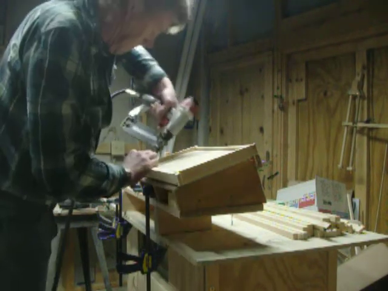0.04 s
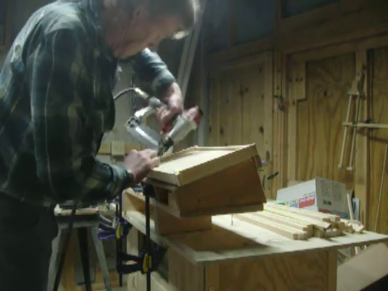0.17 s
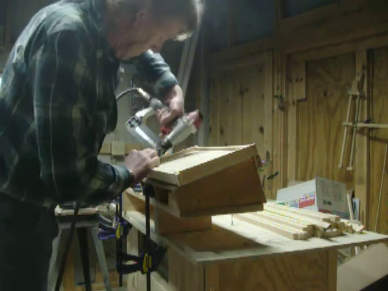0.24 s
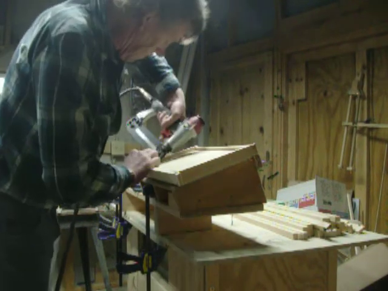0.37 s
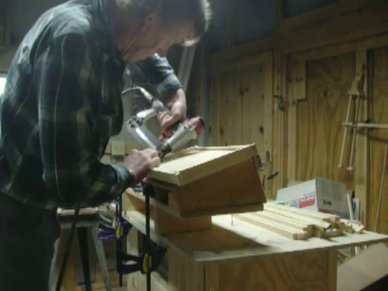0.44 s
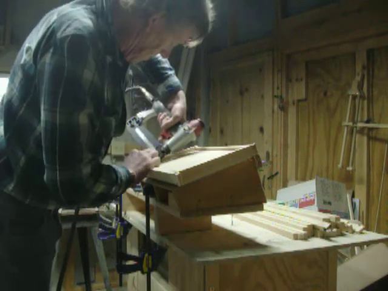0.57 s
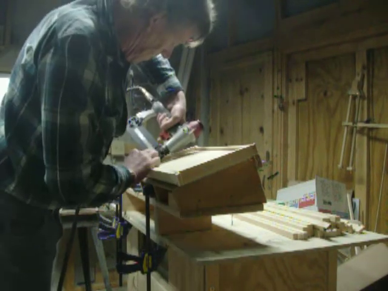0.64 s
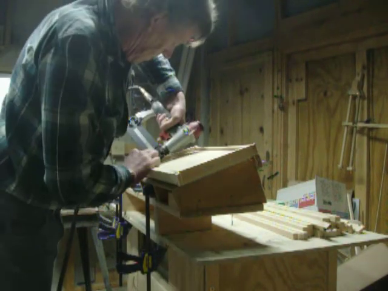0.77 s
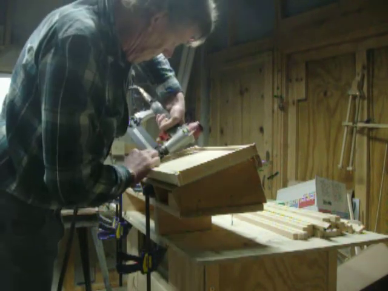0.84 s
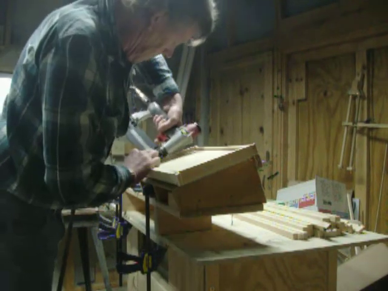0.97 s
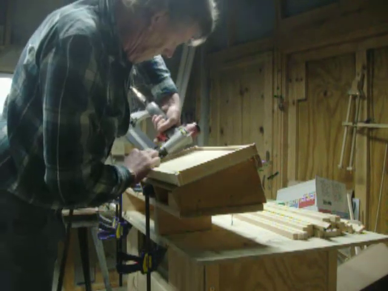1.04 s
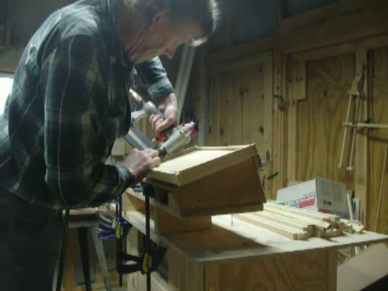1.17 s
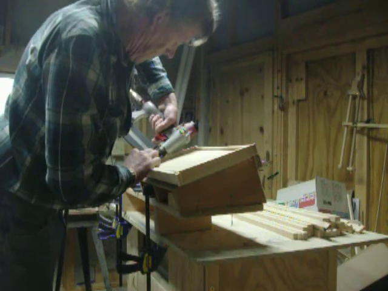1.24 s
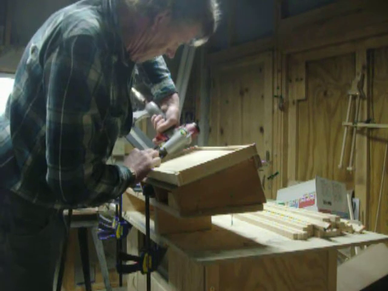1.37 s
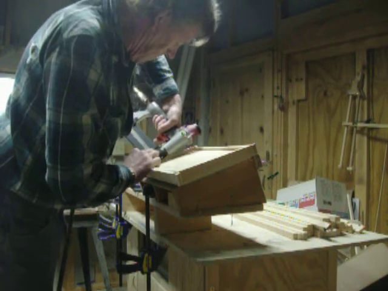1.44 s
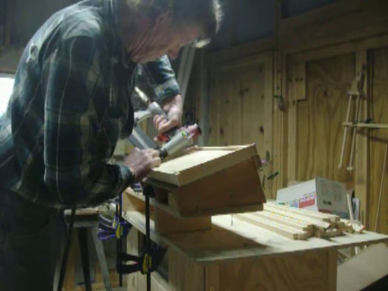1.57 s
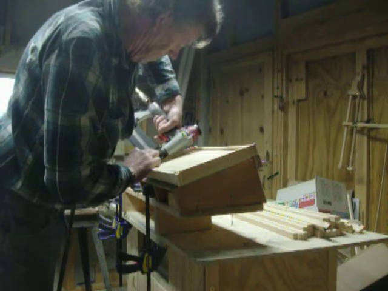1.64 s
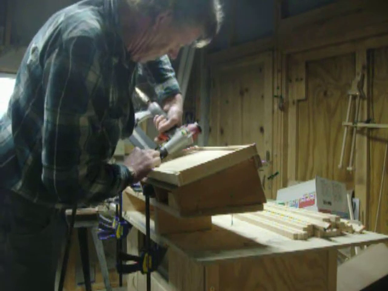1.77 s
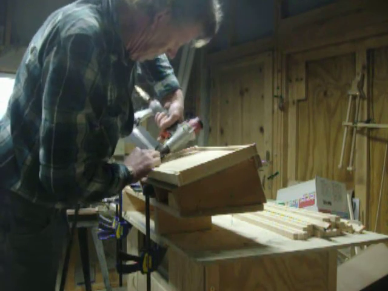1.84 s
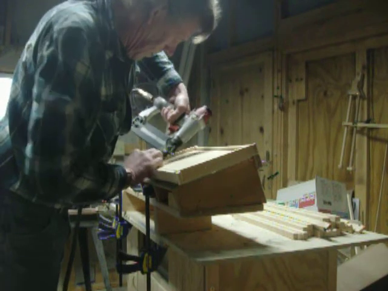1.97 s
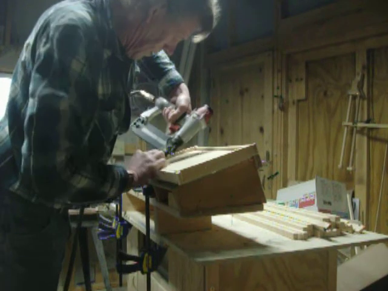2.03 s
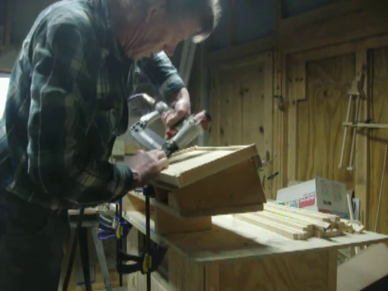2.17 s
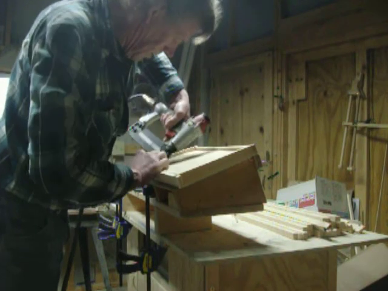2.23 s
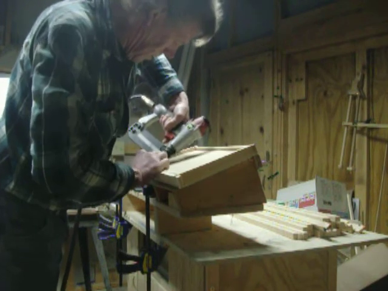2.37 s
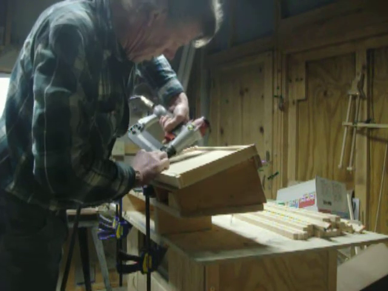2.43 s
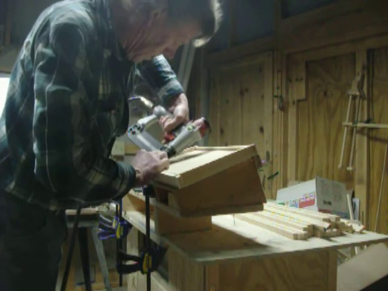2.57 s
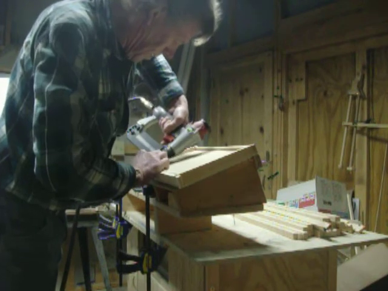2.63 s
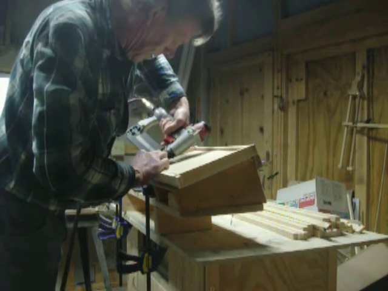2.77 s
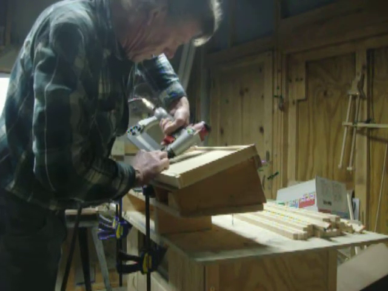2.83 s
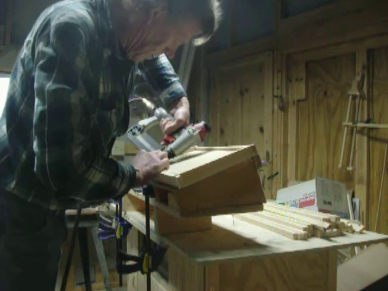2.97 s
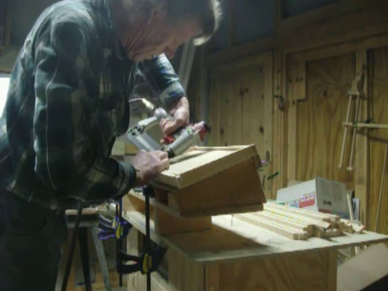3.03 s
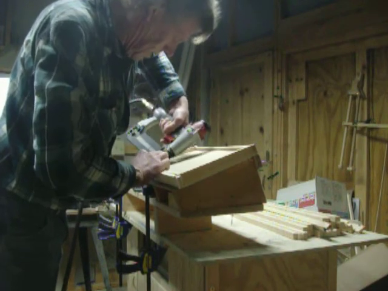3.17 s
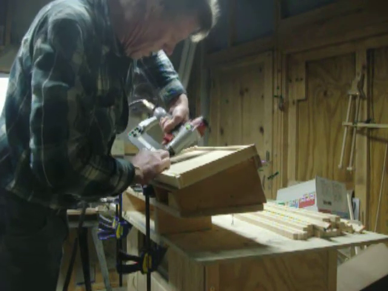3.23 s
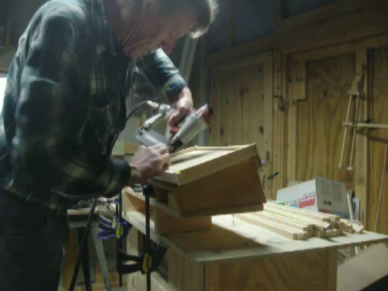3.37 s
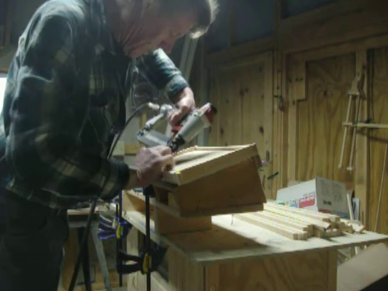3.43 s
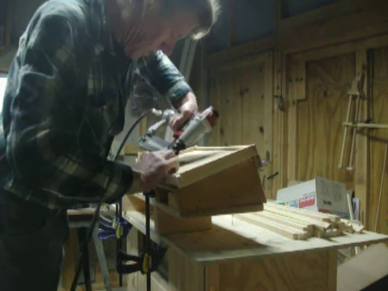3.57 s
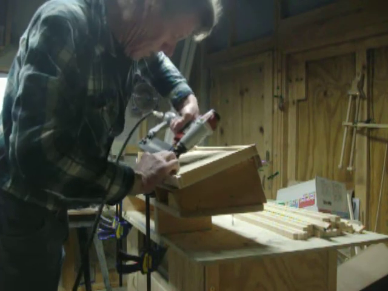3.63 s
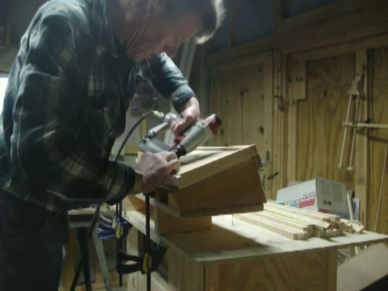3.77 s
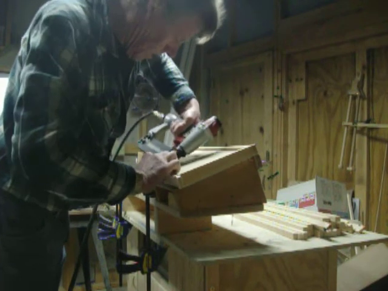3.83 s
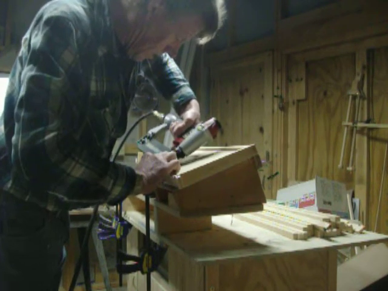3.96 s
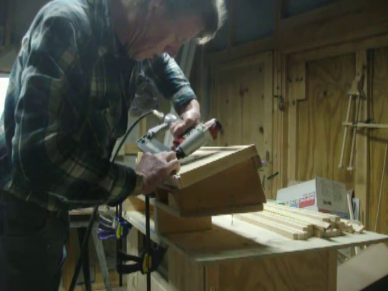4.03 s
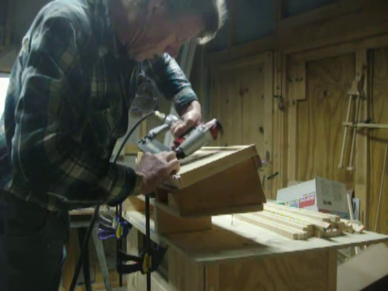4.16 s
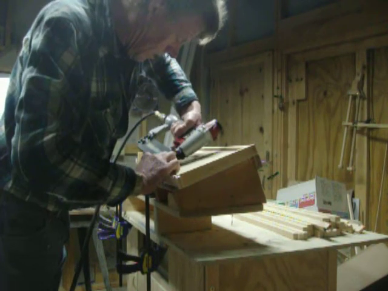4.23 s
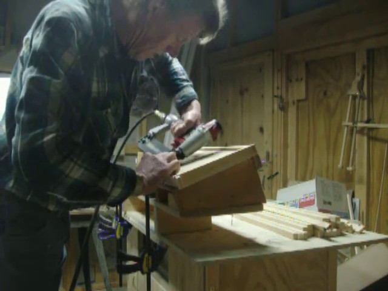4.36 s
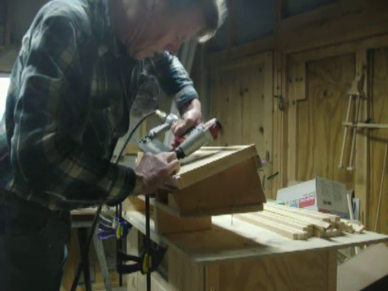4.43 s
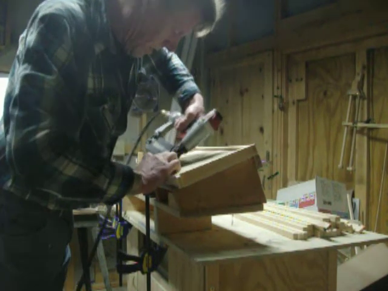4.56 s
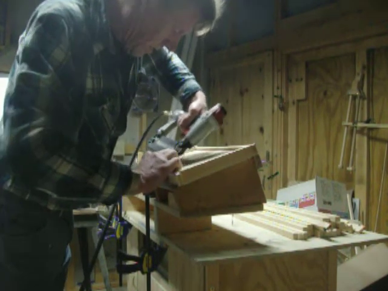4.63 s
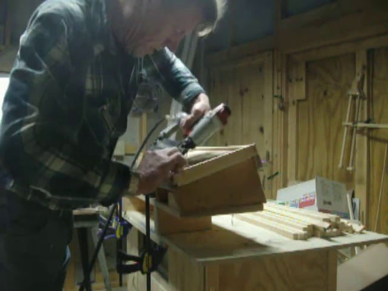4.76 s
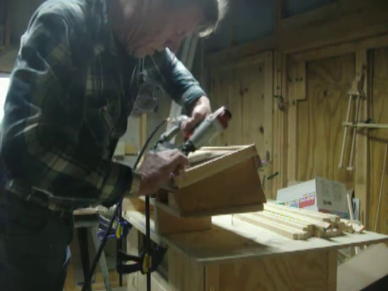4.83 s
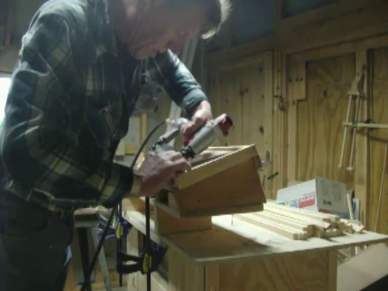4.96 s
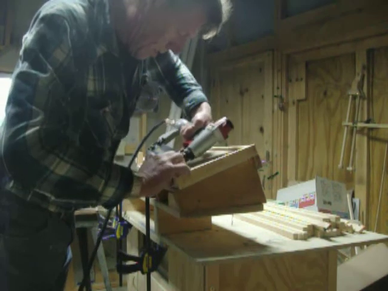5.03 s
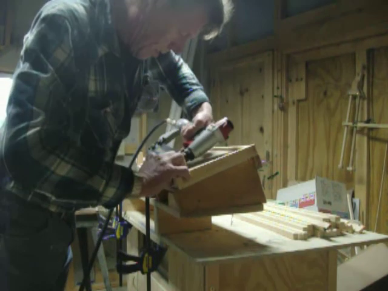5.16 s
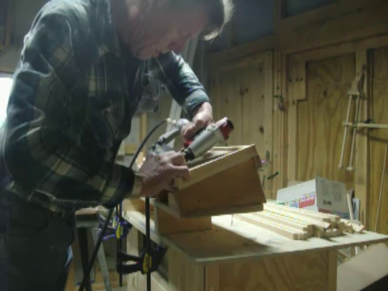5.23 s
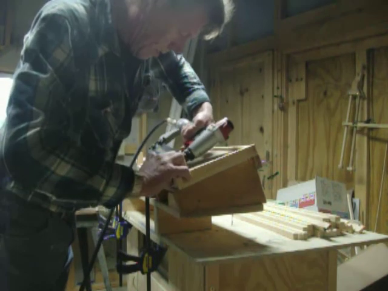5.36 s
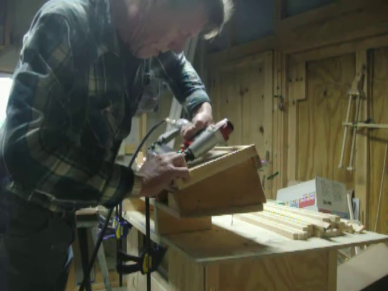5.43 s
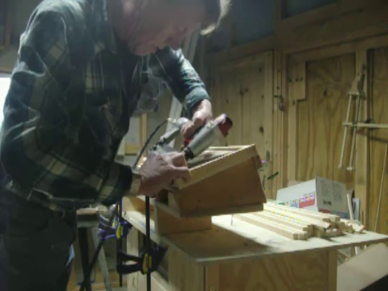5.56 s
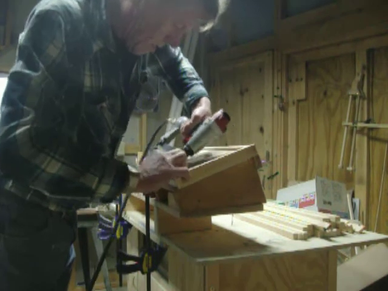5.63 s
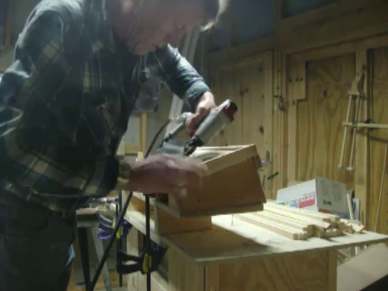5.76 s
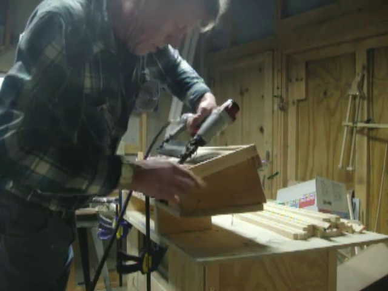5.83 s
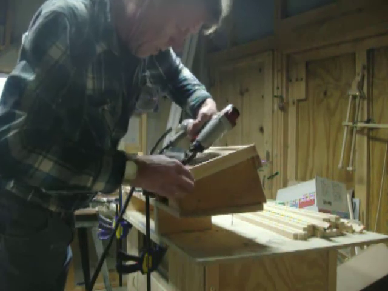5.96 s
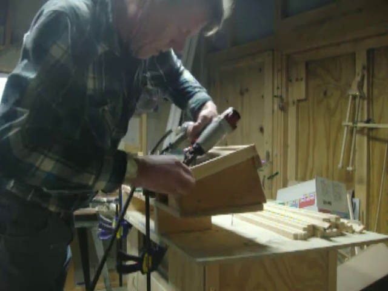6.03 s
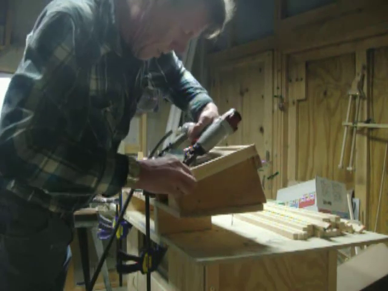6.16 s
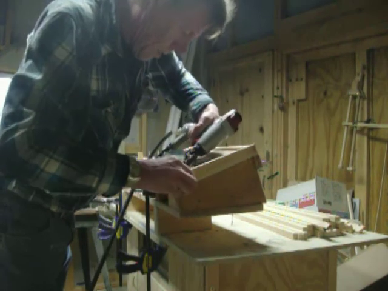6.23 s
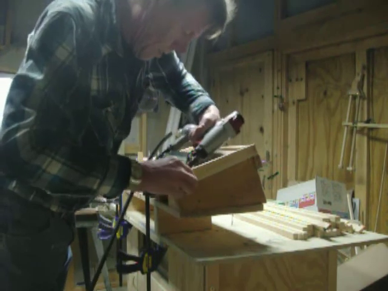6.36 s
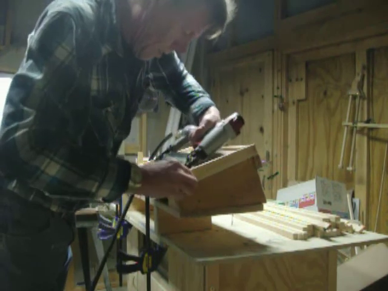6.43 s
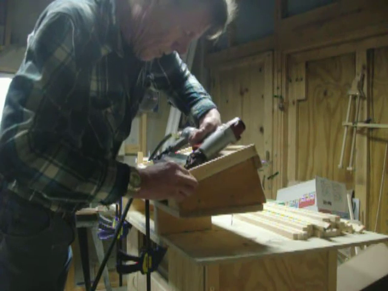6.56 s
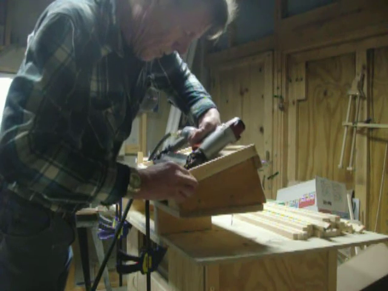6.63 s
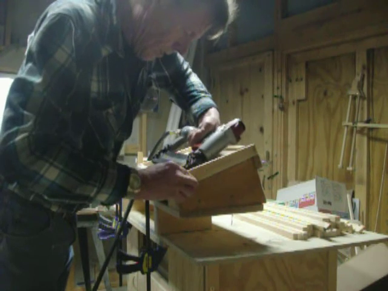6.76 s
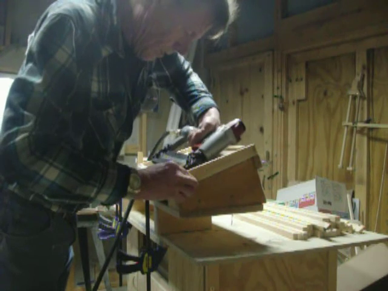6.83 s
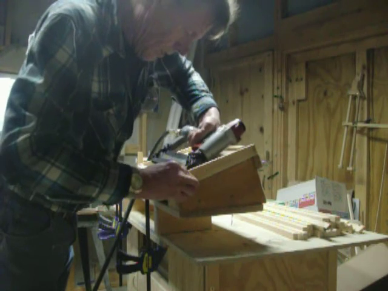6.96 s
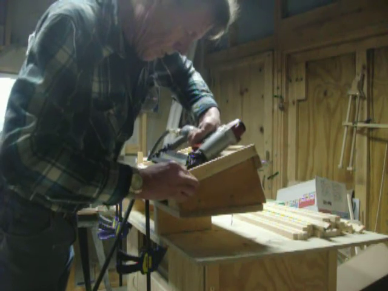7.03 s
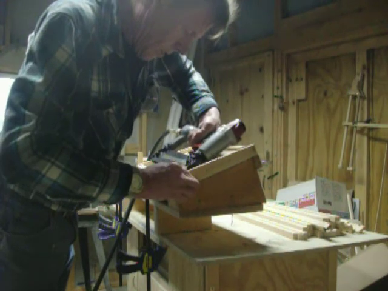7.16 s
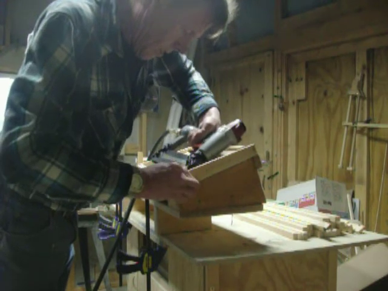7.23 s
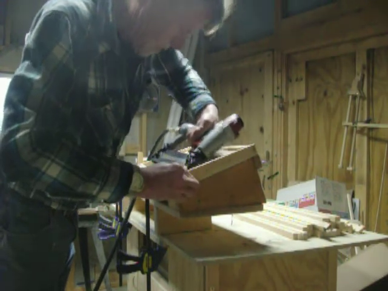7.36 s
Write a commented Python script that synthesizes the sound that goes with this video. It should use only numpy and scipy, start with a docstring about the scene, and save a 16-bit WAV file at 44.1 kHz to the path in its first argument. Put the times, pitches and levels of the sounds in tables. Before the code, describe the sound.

A faint hum and soft rush fill a small workshop, swelling slightly in the first second, while an air nail gun is lined up on a wooden frame with light scrapes and clicks. It fires five loud, sharp shots, at about 1.6, 3.1, 4.3, 5.4 and 7.2 seconds. Each is a spit of air and a bang with a short room ring, followed under a fifth of a second later by venting air and a hard piston clack.

Between shots come quieter metal clicks and hollow double knocks as the tool bumps the wood and rocks back, clearest at about 2.2, 3.6 and 4.8 seconds. The steel magazine clacks at 5 seconds and clangs with a brief ring at 6.5, among a cluster of clicks. The sound has little top treble, the bangs overload slightly, and the level dips for a moment after each.

```python
"""An air-powered nail gun drives five nails into a wooden frame in a small workshop. Each shot is a spit of air
and the bang of the driver on the nail; then air vents and the piston clacks back. Between shots the tool
scrapes over the wood, bumps the frame and rocks back, its nose and safety catch click, and its steel nail
magazine clangs. A faint hum and a rush lie beneath, with two soft, low swells early on. The microphone's
automatic gain control turns everything down for a moment after each bang."""
import sys
import numpy as np
from scipy import signal
from scipy.io import wavfile
from scipy.ndimage import minimum_filter1d

SR = 44100
rng = np.random.default_rng(int(sys.argv[2]) if len(sys.argv) > 2 else 0)


def to_wav(s):
    """Save 16-bit WAV."""
    ch = np.atleast_2d(s).T  # columns
    pcm = np.round(np.clip(ch, -1, 1) * 32767)  # PCM
    wavfile.write(sys.argv[1], SR, pcm.astype(np.int16))


N = 326340
T = np.arange(24576) / SR  # the clock of one short sound [s]

# soft, low swells (at 0.249 s and 1.029 s) and short scrapes (all other rows): # (time [s], length [s], level
# [dB], pitch [Hz], added grit [dB])
SCRAPES_AND_SWELLS = [(-0.07, 0.22, -47, 682, 15.5), (0.249, 0.4, -47, 593, -2),
                      (0.738, 0.056, -41.5, 2870, -8), (1.029, 0.1, -47, 690, 3.5),
                      (4.27, 0.031, -56, 1020, 15), (6.279, 0.083, -52, 1000, 15.5),
                      (6.705, 0.093, -48.5, 2780, 6.5), (6.889, 0.071, -36, 870, 2)]
# the tool bumps the frame: (time [s], level [dB], pitch [Hz], slide before the bump [s])
BUMPS = [(0.619, -28, 687, 0.0053), (.910, -26.5, 630, 0.0097), (2.166, -10.5, 850, 0.014),
         (2.654, -21, 400, 0.0034), (3.583, -1, 610, 0.051), (3.884, -19.5, 480, .012),
         (4.840, -4, 585, 0.045), (7.060, -22.5, 620, 0.0092)]
# nose and safety catch click: (time [s], level [dB], added thud from the wood [dB])
METAL_CLICKS = [(0.6185, -15.5, -6.5), (0.9106, -21.5, -14), (1.467, -33.5, 1), (1.588, -27, -15),
                (2.345, -32, 2.5), (2.4203, -32, 5), (2.581, -23.5, -16), (2.651, -20.5, 4),
                (3.019, -28, -7), (3.684, -24.5, 5.5), (3.794, -22.5, -13), (4.271, -34, 0),
                (4.9955, -11.5, -14.5), (6.007, -22.5, 0.5), (6.16, -28, -5.5), (6.3769, -17.5, -15.5),
                (6.41, -27.5, -10), (6.4646, -18.5, -0.5), (6.471, -22.5, 0), (7.052, -33, -5)]
# the magazine strikes the frame: (time [s], level [dB], added ringing [dB])
MAGAZINE_STRIKES = [(1.534, -30, -31), (3.027, -26.5, -13), (5.006, -13.5, -9.5), (6.501, -14, -1)]
# the driver hits the nail, and the piston flies back: (time [s], level [dB])
NAIL_SHOTS = [(1.6349, 13), (3.072, 13), (4.339, 11), (5.4302, 12), (7.2079, 9)]
PISTON_RETURNS = [(1.7842, 11), (3.228, 13), (4.503, 11), (5.609, 11), (7.3905, 11)]

# tone colours, or how strong a sound is from low to high: (frequency [Hz], level [dB])
RUSH_TONE = [(15, -20.5), (30, -14), (53, -2.5), (100, -6.5), (220, -5.5), (420, -6.5), (630, -9),
             (1100, -15), (2000, -16), (3300, -19), (3950, -10.5), (4400, -20), (4900, -23), (6000, -47.5)]  # the room's background
WOOD_TONE = [(80, -21.5), (250, -2.5), (600, -0.5), (1000, -1.5), (1600, -2), (2400, 0), (3300, -5),
             (4300, -19.5), (5500, -25.5)]  # a dull sound, like a knock on wood
TICK_TONE = [(200, -37), (1500, -25), (2500, -8.5), (3300, -3), (3900, 2), (4250, -2), (4700, -8.5),
             (5400, -20), (6200, -61)]  # small, hard contacts
AIR_TONE = [(100, -14), (500, -12), (1500, -14), (2400, -8), (3100, -0.5), (3900, 5), (4600, -0.5),
            (5400, -10.5), (6200, -38)]  # escaping air
BLOW_TONE = [(40, -25), (150, -21.5), (300, -4.5), (450, -7.5), (1100, 1), (1600, -2), (2500, 2), (3300, 3),
             (3850, 8), (4300, 0.5), (4700, -5), (5400, -15), (6200, -57.5)]  # the driver on the nail
SPLIT_TONE = [(60, -12.5), (250, -6), (1200, 0.5), (1900, -5.5), (3000, -15.5), (6000, -31.5)]  # the nail cracking into the wood
CLACK_TONE = [(40, -40), (150, -6), (300, -8), (450, -8), (1100, -4), (1600, -7), (2500, -0.5), (3300, 2),
              (3850, 5), (4300, -4), (4700, -9.5), (5400, -33), (6200, -38)]  # the piston on its stop
HISS_TONE = [(100, -7.5), (1000, 4), (3400, 3), (3950, -4), (4400, -1.5), (5400, 4), (6200, -32.5)]  # the microphone's own noise

# the notes a part rings with when struck: (frequency [Hz], level [dB], time to fade 60 dB [s])
BOX_NOTES = [(303, -1, 0.059), (407, 0, 0.046), (512, -6, 0.084), (640, -4, .1), (780, -3, .06),
             (910, -3.5, 0.055), (1082, -6, 0.17)]  # the hollow box under the frame
BODY_NOTES = [(775, -7, .12), (1020, -5, .12), (1191, -4, .12), (1304, -6, .14), (1509, -3.5, .14),
              (2002, -2, .14), (2244, -3, .12), (2370, -3, .12), (2710, -3, .12), (2927, -5, .12),
              (3172, -4, .12), (3830, -1, .1), (3970, -1, .12), (4127, -1, .12), (4415, -5, .12)]  # the tool's cast body
CATCH_NOTES = [(3460, -9.5, 0.018), (3900, 3.5, 0.022), (4020, -4.5, 0.014)]  # the safety catch
MAGAZINE_NOTES = [(1294, 3.5, 0.19), (1540, -12, 0.32), (2070, -5.5, 1), (2094, -23.5, .25),
                  (2820, -5.5, 0.4), (3140, -0.5, 0.37), (4000, -10, .4), (4100, -5, .3)]  # the steel nail magazine
FRAME_NOTES = [(41.6, 2, 0.08), (73, -4, 0.084), (127.4, -3.5, 0.093), (187, 4, 0.068), (216, -5, 0.1),
               (355, -3.5, 0.11), (419, 2.5, .12), (655, -6.5, 0.21)]  # the wooden frame

# how long the room rings: (frequency [Hz], time to fade 60 dB [s])
ROOM_FADE = [(60, 0.073), (200, 0.16), (500, 0.51), (1200, 0.32), (2500, 0.37), (4000, 0.36), (6000, 0.34)]
# first echoes from bench and walls: (delay [s], gain [ratio])
FIRST_ECHOES = [(.0028, 0.063), (.0052, 0.11), (0.011, 0.18), (0.017, 0.14), (.034, 0.09)]
# the hum's pitch, and its loudness over time: (time [s], level [dB])
HUM_HZ, HUM_LEVELS = 236.2, [(0, -45), (1.5, -45.5), (3, -50.5), (7.4, -49)]


def amp(db):
    """Turns decibels into a number to multiply by."""
    return 10 ** (np.asarray(db) / 20)


def look_up(table, hz):
    """Reads between a table's rows, giving each octave about equal space."""
    row_hz, value = np.transpose(table)
    return np.interp(np.log(hz + 1), np.log(row_hz + 1), value)


def unit_power(x):
    """Scales a sound to an average power of one."""
    return x / np.sqrt(np.mean(x ** 2) + 1e-20)


def unit_hit(x):
    """Scales a hit to the energy of ten milliseconds at full level."""
    return x / np.sqrt(np.sum(x ** 2) / (SR * .01) + 1e-20)


def add(mix, s, sound):
    """Mixes a sound in at s seconds; one that begins before zero is already under way."""
    start = round(s * SR)
    heard = sound[max(-start, 0):]
    part = mix[max(start, 0):][:len(heard)]
    part += heard[:len(part)]


def colour(x, tone):
    """Gives a sound a tone colour without smearing it ahead of its start."""
    hz = abs(np.fft.fftfreq(4096, 1 / SR))
    log_gain = np.log(amp(look_up(tone, hz)))
    response = np.exp(np.conj(signal.hilbert(log_gain)))
    taps = np.fft.ifft(response).real[:2048]
    return signal.fftconvolve(x, taps)[:len(x)]


def fade(fade_s):
    """A level that falls 60 dB in fade_s seconds."""
    return np.exp(-np.log(1000) * T / np.maximum(fade_s, 1e-4))


def rattle(tone, fade_s):
    """A struck part rattles: a fading burst of noise in its tone colour."""
    return unit_hit(colour(rng.standard_normal(len(T)) * fade(fade_s), tone))


def ring(notes, spread_db=1, detune=0):
    """A struck part rings with fading notes, a little differently each time."""
    sound = np.zeros(len(T))
    for hz, db, fade_s in notes:
        louder, higher = rng.standard_normal(2)
        wave = np.sin(2 * np.pi * hz * (1 + detune * higher) * T)
        sound += amp(db + spread_db * louder) * fade(fade_s) * wave
    return unit_hit(sound)


def resonate(x, hz, width_hz):
    """Brings out the band of sound around one pitch."""
    return signal.lfilter(*signal.iirpeak(hz, hz / width_hz, SR), x)


def room(x, echo_db, direct=1, build_s=0.0044):
    """Sound arrives directly, as first echoes and as a dense tail, a little different each time."""
    hz, t, bands = signal.stft(rng.choice([-1., 1.], len(T)), SR, nperseg=256)
    band_fade = np.exp(-np.log(1000) * t / look_up(ROOM_FADE, hz)[:, None])
    tail = signal.istft(bands * band_fade, SR, nperseg=256)[1][:len(T)]
    tail *= 1 - np.exp(-T / build_s)
    paths = tail / np.linalg.norm(tail)
    for s, gain in FIRST_ECHOES:
        paths[int(s * rng.uniform(.9, 1.1) * SR)] += gain
    paths *= amp(echo_db)
    paths[0] += direct
    return signal.fftconvolve(x, paths)[:len(T)]


def hit(tone, fade_s, echo_db, rattle_db, direct=0.17):
    """A sharp impact fills the room while the shaken parts rattle to rest."""
    impact = unit_hit(colour(signal.unit_impulse(len(T)), tone))
    return room(impact, echo_db, direct) + amp(rattle_db) * rattle(tone, fade_s)


def workshop(rush_db=-39.5, waver_db=0.46):
    """The workshop's steady rush and a faint, wavering hum."""
    t = np.arange(N) / SR
    turns = np.linspace(0, N / SR, num=75)
    swell, drift, wobble = (np.interp(t, turns, rng.standard_normal(len(turns))) for _ in range(3))
    rush = unit_power(colour(rng.standard_normal(N), RUSH_TONE)) * amp(rush_db + waver_db * swell)
    phase = 2 * np.pi * np.cumsum(HUM_HZ + 3 * drift) / SR
    hum = unit_power(np.sin(phase) * amp(2.5 * wobble))
    return rush + amp(np.interp(t, *np.transpose(HUM_LEVELS))) * hum


def grainy_noise(length_s, hz, grit_db, grains_per_s=1500):
    """Tiny random pulses blend into noise that rises and falls; in a scrape, each is a slip on wood."""
    arch = np.sqrt(np.maximum(np.sin(np.pi * np.minimum(T / length_s, 1)), 0))
    grains = rng.standard_normal(len(T)) * (rng.random(len(T)) < grains_per_s / SR)
    dull = unit_power(colour(grains, WOOD_TONE))
    grit = unit_power(unit_power(colour(grains, TICK_TONE)) + dull)
    return arch * (unit_power(resonate(dull, hz, width_hz=290)) + amp(grit_db) * grit)


def scrapes_and_swells():
    """Short scrapes of the tool on wood, and two soft, low swells early on."""
    out = np.zeros(N)
    for s, length_s, db, hz, grit_db in SCRAPES_AND_SWELLS:
        add(out, s, amp(db) * room(grainy_noise(length_s, hz, grit_db), echo_db=-1))
    return out


def body_ring():
    """The tool's cast body rings briefly; grip and pressure favour different notes each time."""
    return amp(-4.5) * room(ring(BODY_NOTES, spread_db=4, detune=.006), echo_db=1)


def click(thud_db):
    """Small steel parts ping and tick, the wood under them thuds, and the magazine rings on."""
    echo_db = -0.5 + 0.28 * thud_db  # the more wood is shaken, the more the room answers
    ping = room(ring(CATCH_NOTES) * (1 - np.exp(-T / 0.00074)), echo_db=-4.5)
    tick = amp(1.5) * hit(TICK_TONE, fade_s=0.023, echo_db=echo_db, rattle_db=-3.5)
    body = amp(-7) * body_ring()
    thud = amp(thud_db) * hit(WOOD_TONE, fade_s=0.14, echo_db=echo_db, rattle_db=-7.5)
    return ping + tick + body + thud + amp(-21.5) * ring(MAGAZINE_NOTES)


def loose_parts(count=40, ticks_per_s=3.5, level_db=-45, spread_db=1):
    """Loose parts tick faintly at random moments while the tool is held."""
    out, s = np.zeros(N), 0
    tick = click(thud_db=-9)
    for wait, strength in zip(rng.exponential(size=count), rng.standard_normal(count)):
        s += wait / ticks_per_s
        add(out, s, amp(level_db + spread_db * strength) * tick)
    return out


def knock(hz, loss_db_per_octave=20):
    """A hard tap on the frame stirs the hollow box below, mostly its notes near the knock's pitch."""
    thud = hit(WOOD_TONE, fade_s=0.16, echo_db=-3, rattle_db=5.5)
    wood = unit_hit(resonate(thud, hz, width_hz=170))
    notes = [(f, db - loss_db_per_octave * abs(np.log2(f / hz)), fade_s) for f, db, fade_s in BOX_NOTES]
    hollow = unit_hit(room(ring(notes, spread_db=1.5) * (1 - fade(0.012)), echo_db=-4.5))
    tick = hit(TICK_TONE, fade_s=0.05, echo_db=0.5, rattle_db=1, direct=.1)
    tap = hit(WOOD_TONE, fade_s=.04, echo_db=-1.5, rattle_db=-0.5, direct=.1)
    contact = unit_hit(tick + amp(2) * tap)
    return amp(-3.5) * wood + amp(-3) * hollow + amp(-6) * contact + amp(-20.5) * body_ring()


def frame_bumps(rock_s=.023, rock_db=-4, rock_pitch_ratio=0.683):
    """The tool slides along, bumps the frame and rocks onto its heel with a softer, lower knock."""
    out = np.zeros(N)
    for s, db, hz, slide_s in BUMPS:
        slide = np.minimum(T / slide_s, 1) * grainy_noise(slide_s + rock_s, hz=930, grit_db=1.5)
        add(out, s - slide_s, amp(db - 16) * room(slide, echo_db=0.5))
        add(out, s, amp(db) * knock(hz))
        add(out, s + rock_s, amp(db + rock_db) * knock(hz * rock_pitch_ratio))
    return out


def nose_clicks():
    """The nose and safety catch click as the tool is lined up."""
    out = np.zeros(N)
    for s, db, thud_db in METAL_CLICKS:
        add(out, s, amp(db) * click(thud_db))
    return out


def magazine_clangs():
    """The steel magazine clacks against the wood and, where it is free, rings on."""
    out = np.zeros(N)
    for s, db, ring_db in MAGAZINE_STRIKES:
        thud = hit(WOOD_TONE, fade_s=0.08, echo_db=-2, rattle_db=-9.5)
        tick = amp(-7.5) * hit(TICK_TONE, fade_s=0.029, echo_db=0, rattle_db=-14)
        body = amp(0.5) * body_ring()
        steel = amp(ring_db) * ring(MAGAZINE_NOTES) * (1 - fade(.025))
        add(out, s, amp(db) * (thud + tick + body + steel))
    return out


def valve_air(length_s, spit_db, spit_fade_s):
    """A valve snaps open with a spit, then hisses until the piston reaches its stop."""
    spit = 1 + amp(spit_db) * fade(spit_fade_s)
    opening = np.minimum(T / 0.0026, 1)
    closing = np.exp(-np.maximum(T - length_s, 0) / 0.0099)
    return unit_power(colour(rng.standard_normal(len(T)), AIR_TONE)) * spit * opening * closing


def pressure_pulse(push_s):
    """The air is given a quick push, followed by a gentle pull."""
    age = T / push_s
    return (1 - age) * np.exp(-age) * (1 - np.exp(-8 * age))


def nail_shots(lead_s=.026, valve_db=-17.5):
    """Air fills the cylinder; the driver slams the nail home and shakes tool and frame."""
    out = np.zeros(N)
    for s, db in NAIL_SHOTS:
        air = room(valve_air(lead_s, spit_db=10, spit_fade_s=0.016), echo_db=-12.5)
        snap = amp(-10.5) * rattle(WOOD_TONE, fade_s=0.0075)
        puff = amp(3.5) * pressure_pulse(push_s=0.015)
        add(out, s - lead_s, amp(valve_db) * (air + snap + puff))
        blow = hit(BLOW_TONE, fade_s=0.69, echo_db=6, rattle_db=-1.5, direct=0.4) + body_ring()
        crack = amp(-4.5) * rattle(SPLIT_TONE, fade_s=0.009)
        shock = amp(5.5) * pressure_pulse(push_s=0.00099)
        thump = amp(-7.5) * room(ring(FRAME_NOTES), echo_db=-3.5)
        add(out, s, amp(db) * (blow + crack + shock + thump))
    return out


def piston_returns(lead_s=.022, exhaust_db=-5.5):
    """The trigger is let go: the air rushes out and the piston claps against its top stop."""
    out = np.zeros(N)
    for s, db in PISTON_RETURNS:
        exhaust = room(valve_air(lead_s, spit_db=-4.5, spit_fade_s=0.019), echo_db=-7)
        add(out, s - lead_s, amp(db + exhaust_db) * exhaust)
        clack = hit(CLACK_TONE, fade_s=0.065, echo_db=3.5, rattle_db=-1.5, direct=0.22) + body_ring()
        thump = amp(-14) * room(ring(FRAME_NOTES), echo_db=-10)
        snap = amp(-9) * rattle(WOOD_TONE, fade_s=0.0075)
        add(out, s, amp(db) * (clack + snap + thump))
    return out


def scene():
    """The workshop, the handling of the tool and the nailing, together in one channel."""
    quiet_sounds = workshop() + scrapes_and_swells() + loose_parts()
    handling = frame_bumps() + nose_clicks() + magazine_clangs()
    return (quiet_sounds + handling + nail_shots() + piston_returns())[None]


def gain_control(x, limit_db=-6, hold_s=0.15, recover_db_per_s=29):
    """Turns the level down within milliseconds of a loud sound, holds it, then creeps back up."""
    power = signal.lfilter(*signal.butter(1, 50, fs=SR), x ** 2)
    over_db = np.maximum(10 * np.log10(np.abs(power) + 1e-12) - limit_db, 0)
    window = 2 * int(hold_s * SR / 2) + 1
    held_db = -minimum_filter1d(-over_db, window, origin=window // 2, mode="constant")
    recovery_db = recover_db_per_s * np.arange(N) / SR
    cut_db = np.maximum.accumulate(held_db + recovery_db) - recovery_db
    # the cut comes slightly late, so the front of each bang gets through
    return x / amp(signal.lfilter(*signal.butter(1, 110, fs=SR), cut_db))


def low_pass(x, hz, taps):
    """Steeply cuts away the sound above hz."""
    return signal.oaconvolve(x, signal.firwin(taps, hz, window=("kaiser", 9), fs=SR), "same")


def record(dry, hiss_db=-55, soft_limit=.69, hard_limit=.745):
    """A microphone with gain control, little top treble and a thin hiss; the tallest peaks overload."""
    x = gain_control(dry[0]) + amp(hiss_db) * unit_power(colour(rng.standard_normal(N), HISS_TONE))
    squashed = x / (1 + (x / soft_limit) ** 4) ** .25
    dulled = low_pass(squashed, hz=6000, taps=255)
    clipped = np.clip(dulled, -hard_limit, hard_limit)
    return low_pass(clipped, hz=15900, taps=511)[None]


dry = scene()
out = record(dry)
to_wav(out)
```